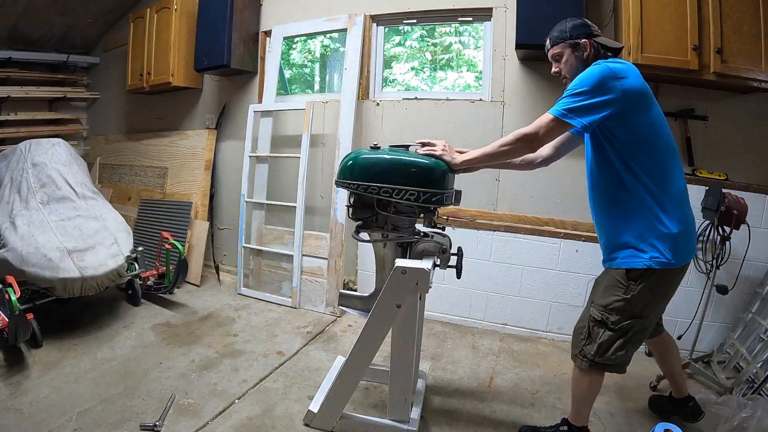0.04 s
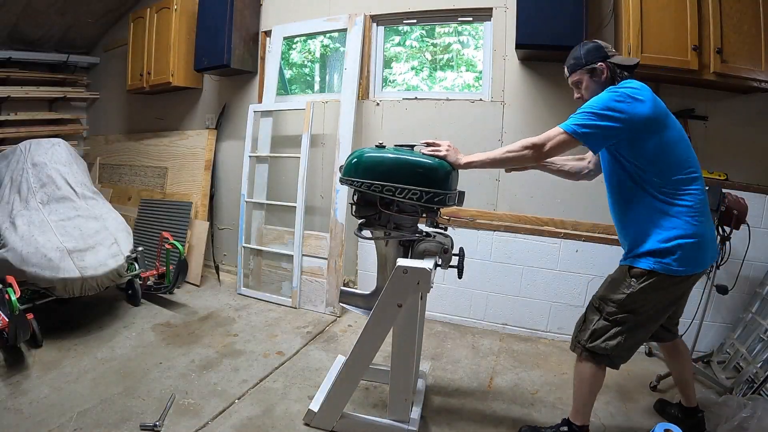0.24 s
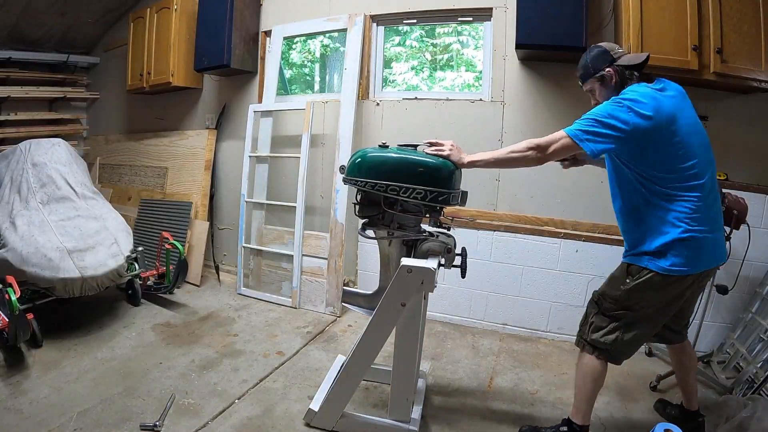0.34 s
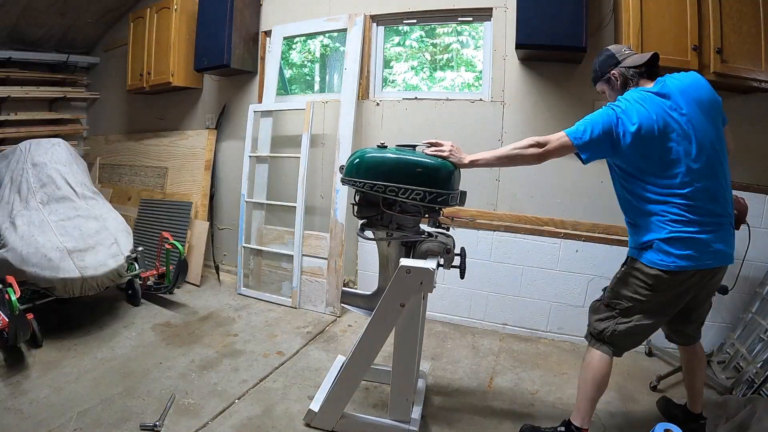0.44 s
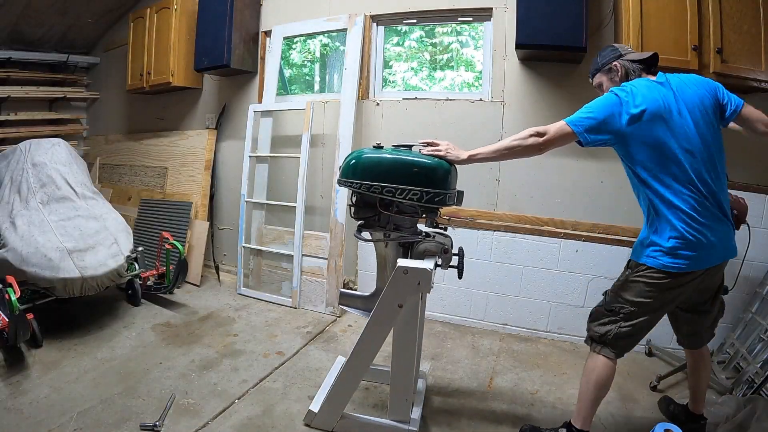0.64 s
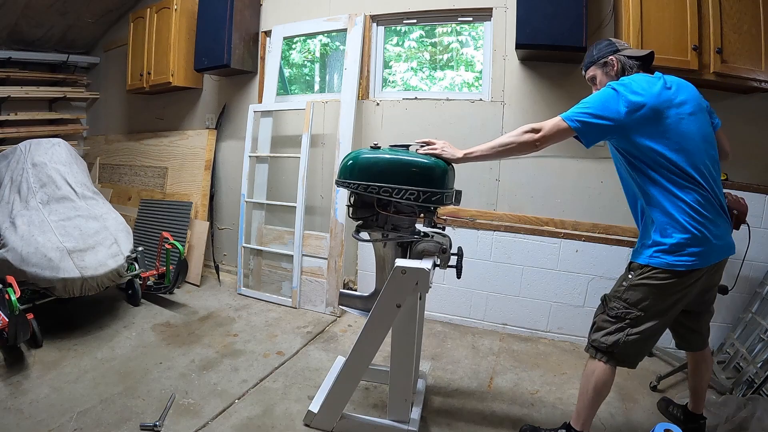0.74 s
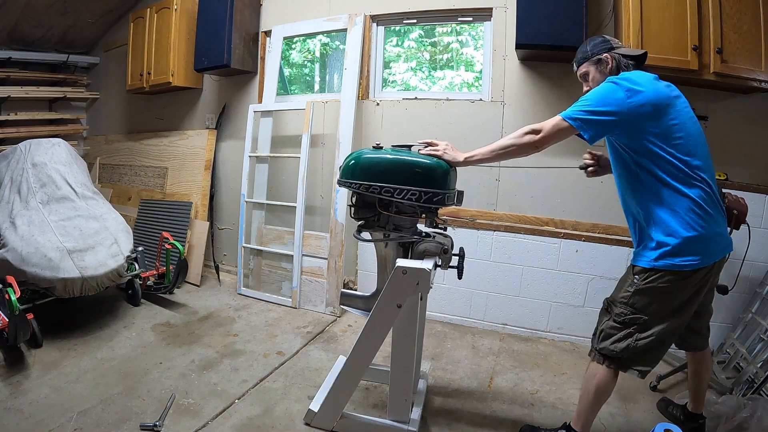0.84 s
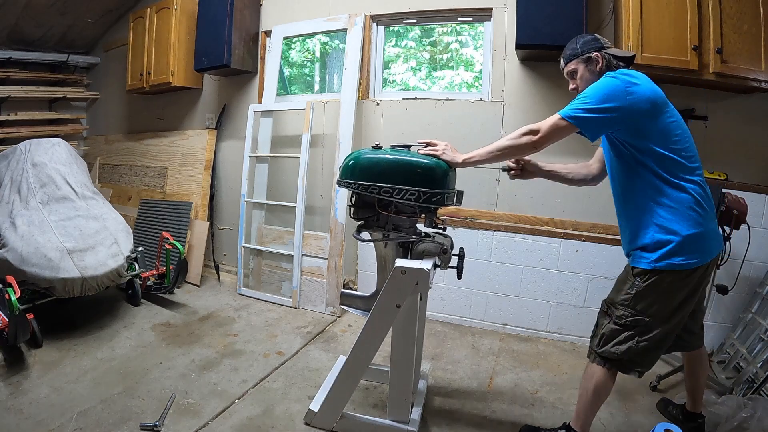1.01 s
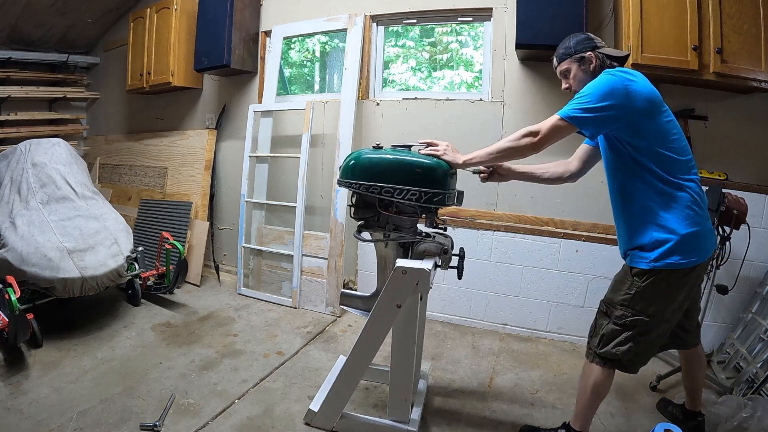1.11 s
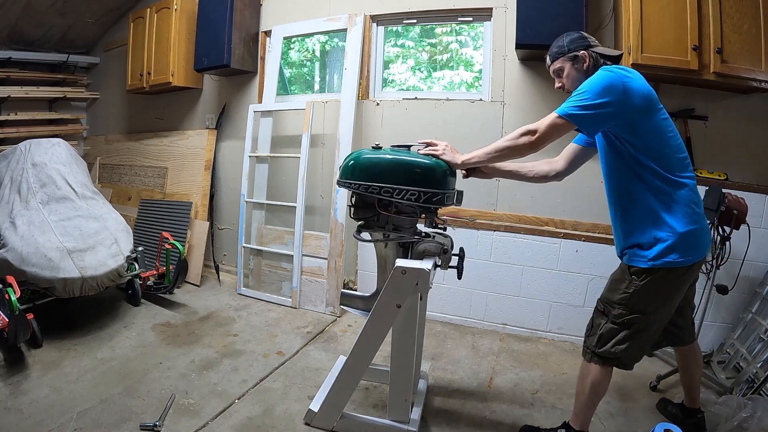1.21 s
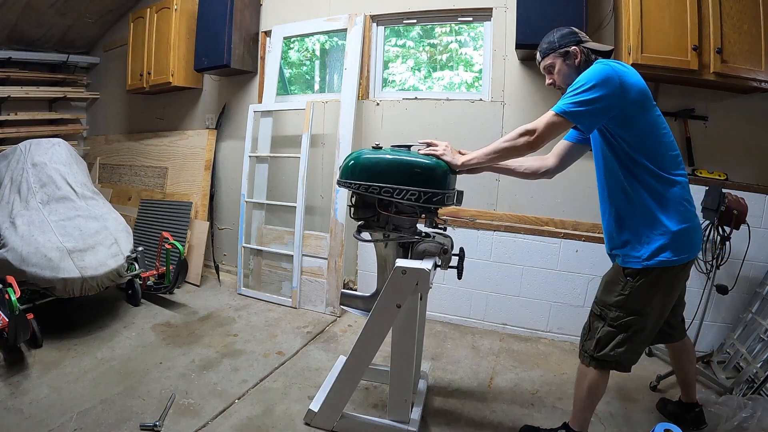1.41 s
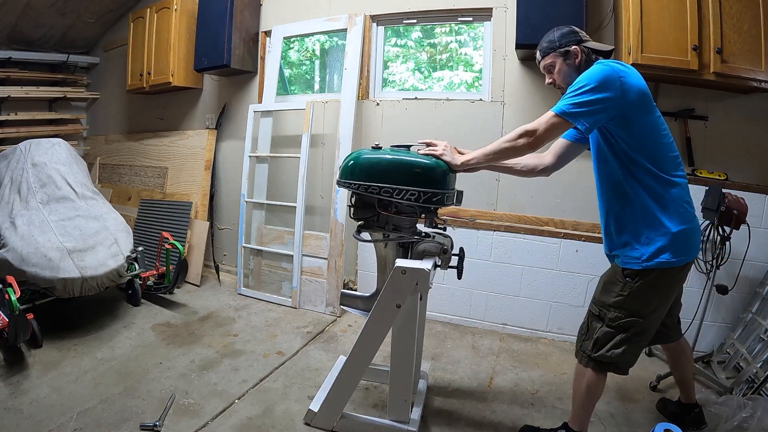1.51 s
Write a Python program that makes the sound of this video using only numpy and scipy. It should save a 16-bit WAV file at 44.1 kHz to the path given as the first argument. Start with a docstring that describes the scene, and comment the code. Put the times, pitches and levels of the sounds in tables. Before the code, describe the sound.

An outboard motor is pull-started once, puffing and coasting down without catching.

```python
"""Outboard pulled over, no start

A two-stroke outboard on a stand in a garage is pulled once and does not catch. The starter pawls clack
in, the cord rasps off its reel, and each piston stroke puffs through the exhaust leg while the
carburettor gulps. The engine coasts down, the cord rewinds and its handle smacks home over a low hum."""
import sys
import numpy as np
from scipy import signal
from scipy.fft import rfft, irfft, next_fast_len
from scipy.io import wavfile

SR = 44100
rng = np.random.default_rng(int(sys.argv[2]) if len(sys.argv) > 2 else 0)


def store_wav(level_fs):
    """Save 16-bit WAV to argv[1]."""
    pcm = np.round(np.clip(np.atleast_2d(level_fs), -1, 1) * 32767)
    wavfile.write(sys.argv[1], SR, pcm.T.astype(np.int16))


N = 68355
T = np.arange(N) / SR


def amp(db):
    """Decibels to gain."""
    return 10 ** (np.asarray(db) / 20)


def unit(x):
    """Scale to rms 1."""
    return x / np.sqrt(np.mean(x ** 2))


def swell(rows):
    """Gain curve through (time_s, level_db) points."""
    return amp(np.interp(T, *np.array(rows).T))


def at_hz(rows, hz):
    """Read a table on a log-frequency axis."""
    freqs, values = np.array(rows, float).T
    return np.interp(np.log(np.maximum(hz, 1)), np.log(freqs), values)


def colour(x, rows, tilt_db_per_oct=0, keep_power=True):
    """Minimum-phase filter through (freq_hz, gain_db) points; keep_power holds white noise's power."""
    size = 2 * next_fast_len(N)
    hz = np.fft.rfftfreq(size, 1 / SR)
    gain = amp(at_hz(rows, hz) + tilt_db_per_oct * np.log2(np.maximum(hz, 200)))
    cepstrum = irfft(np.log(unit(gain) if keep_power else gain))
    cepstrum[1:size // 2] *= 2
    cepstrum[size // 2 + 1:] = 0
    return irfft(rfft(x, size) * np.exp(rfft(cepstrum)))[:N]


def resonate(x, modes):
    """Parallel resonances of (freq_hz, width_hz, gain_db)."""
    return sum(amp(db) * signal.lfilter(*signal.iirpeak(hz, hz / width_hz, SR), x + 1e-18)
               for hz, width_hz, db in modes)


def resonant_noise(modes):
    """Noise passed twice through the resonances, rms 1."""
    return unit(resonate(resonate(rng.standard_normal(N), modes), modes))


def grains(per_s, scatter_db, hiss):
    """Dense tiny contacts over hiss, rms 1."""
    clicks = (rng.random(N) < per_s / SR) * rng.choice([-1, 1], N)
    sizes = amp(scatter_db * np.clip(rng.standard_normal(N), -2, 2))
    return unit(unit(clicks * sizes) + hiss * rng.standard_normal(N))


def burst(start_s, rise_s, decay_s):
    """Quick rise, exponential fall."""
    age_s = np.maximum(T - start_s, 0)
    return (1 - np.exp(-age_s / rise_s)) * np.exp(-age_s / decay_s)


def pulse(centre_s, sigma_s):
    """Gaussian pressure pulse."""
    return np.exp(-.5 * ((T - centre_s) / sigma_s) ** 2)


# garage decay: freq_hz, t60_s
GARAGE_DECAY = [(150, 0.74), (500, 1.06), (1400, 0.68), (4000, .5), (10000, 0.58)]
# echo side channel: freq_hz, gain_db
SIDE_COLOUR = [(60, -27), (130, -31.5), (260, -19.5), (500, -11.5), (1000, -10), (2000, -4), (3300, -2.5),
               (5000, -8.5), (7000, -4.5), (9000, -5)]


def garage(x, wet_db, build_s=0.00073, near_s=0.0011, near_db=-5.5):
    """Direct sound plus diffuse echoes, wider and shorter in the treble."""
    edges_hz = np.geomspace(80, 16000, 9)
    t60_s = at_hz(GARAGE_DECAY, np.sqrt(edges_hz[1:] * edges_hz[:-1]))
    band = np.digitize(np.fft.rfftfreq(N, 1 / SR), edges_hz[1:-1])
    spectrum = rfft(rng.standard_normal((2, N)))
    tail = sum(irfft(spectrum * (band == k), N) * amp(-60 * T / t60) for k, t60 in enumerate(t60_s))
    tail = unit(tail * (1 - np.exp(-T / build_s))) * amp(wet_db) / np.sqrt(N)
    mid, side = signal.fftconvolve(x[None], tail, axes=1)[:, :N]
    # first wall and floor reflections reach the two sides differently
    near = unit(rng.standard_normal(N) * np.exp(-T / near_s)) * amp(near_db) / np.sqrt(N)
    side = side + signal.fftconvolve(x, near)[:N]
    return x + mid + colour(side, SIDE_COLOUR, keep_power=False) * np.array([[1], [-1]])


# room air: freq_hz, gain_db
AIR_COLOUR = [(20, -6), (35, -14), (48, 0), (75, 2), (130, -14), (300, -31.5), (700, -35), (1400, -28.5),
              (2500, -36), (6000, -36), (9000, -48.5), (15000, -56)]


def room_air(level_db=-49.5):
    """Faint steady noise, mostly bass."""
    return amp(level_db) * colour(rng.standard_normal(N), AIR_COLOUR)


# hum, lower tone: time_s, rms_db
HUM_CURVE = [(.2, -40.5), (.33, -58), (1.1, -51.5), (1.55, -47)]


def hum(pitch_hz=73.3, beat_hz=8.1, upper_db=-6.5):
    """Two close low tones beat as a throb."""
    lower = np.sin(2 * np.pi * pitch_hz * T)
    upper = amp(upper_db) * np.sin(2 * np.pi * (pitch_hz + beat_hz) * T)
    return np.sqrt(2) * swell(HUM_CURVE) * (lower - upper)


# powerhead and cowl modes: freq_hz, width_hz, gain_db
COWL_MODES = [(345, 7.9, -5), (370, 52, 2.5), (996, 90, -6), (952, 55, 4.5), (1168, 41, 0.5),
              (1482, 127, 2), (1743, 73, -7), (2644, 30, -2.5), (5980, 70, -2), (6690, 75, 4.5)]


def cowl(contact):
    """Contact noise plus the modes it rings."""
    return contact + resonate(contact, COWL_MODES)


# motor rocking: start_s, level_db, decay_s
MOUNT_ROCKS = [(0.154, -45.5, 0.018), (1.24, -28, 0.012), (1.297, -31.5, 0.0087), (1.405, -36.5, 0.014)]
# rocking spectrum: freq_hz, gain_db
MOUNT_COLOUR = [(80, -4), (280, -18), (350, 16), (420, 13), (550, -5), (950, 6), (2000, -38), (8000, -60)]
# stand rumble: time_s, level_db
RUMBLE_CURVE = [(.15, -68), (.42, -41), (.63, -40), (.9, -34), (1.1, -78)]


def stand(rise_s=0.013, rumble_hz=66, width_hz=37):
    """The motor shifts on its mount and the pull shakes the wooden stand."""
    rocking = sum(amp(db) * burst(start_s, rise_s, decay_s) for start_s, db, decay_s in MOUNT_ROCKS)
    rumble = resonant_noise([(rumble_hz, width_hz, 0)]) * swell(RUMBLE_CURVE)
    return cowl(colour(rocking * rng.standard_normal(N), MOUNT_COLOUR)) + rumble


# handle hits on the cowl: start_s, level_db, rise_s, decay_s
HANDLE_HITS = [(1.182, -29.5, 0.005, 0.017), (1.189, -18, 0.0075, 0.021), (1.221, -27, 0.0044, 0.019)]
# clatter spectrum: freq_hz, gain_db
CLATTER_COLOUR = [(60, -12), (250, -10), (380, -2.5), (600, -2.5), (1200, -2), (1550, 3.5), (2300, 0),
                  (3300, -1.5), (4800, 1.5), (6700, -2.5), (8000, -7.5), (12000, -15), (15000, -32)]
# handle and lid modes: freq_hz, width_hz, gain_db
LID_MODES = [(360, 29, 10), (1440, 19, 10), (1590, 82, 2), (1904, 60, -2), (2800, 45, 2), (3160, 200, 3.5),
             (4700, 190, 0), (6720, 200, 5.5)]


def handle():
    """The spring pulls the handle home: bright clatter fills the garage, the lid rings briefly."""
    contact = sum(amp(db) * burst(start_s, rise_s, decay_s)
                  for start_s, db, rise_s, decay_s in HANDLE_HITS)
    clatter = colour(contact * grains(per_s=6000, scatter_db=0, hiss=1.0), CLATTER_COLOUR)
    return garage(clatter, wet_db=-4) + resonate(clatter, LID_MODES)


# cord take-up, pull and rewind: time_s, relative_db
CORD_CURVE = [(.10, -81), (.155, -73), (.198, -49), (.25, -18), (.33, -27), (.375, -29.5), (.435, -28),
              (.495, -14), (.55, -16.5), (.615, -25.5), (.655, -17.5), (.73, -27), (.80, -23.5),
              (.89, -19.5), (.945, -27.5), (1.01, -24.5), (1.06, -36), (1.135, -34.5), (1.18, -39.5),
              (1.30, -31), (1.37, -85)]
# rasp spectrum: freq_hz, gain_db
CORD_COLOUR = [(60, -19), (200, -9), (550, 0), (1100, -3), (2400, -2.5), (4000, -6), (6500, -9),
               (7800, -14.5), (12000, -25), (15000, -44)]


def cord(gain_db=-8):
    """The cord rasps through its guide and the reel scrapes under the cowl."""
    rasp = grains(per_s=1800, scatter_db=3, hiss=0.84) * swell(CORD_CURVE)
    return amp(gain_db) * cowl(colour(rasp, CORD_COLOUR))


def pawl(pitch_hz=5930, gain_db=-14):
    """The steel pawl pings as it drops into the flywheel."""
    envelope = burst(start_s=0.2245, rise_s=0.00071, decay_s=0.006)
    return amp(gain_db) * envelope * np.sin(2 * np.pi * pitch_hz * T)


# pawl and reel knocks: start_s, relative_db, rise_s, decay_s, tilt_db_per_oct, thud_offset_db
STARTER_KNOCKS = [(0.137, -29.5, 0.026, 0.018, -2, -29), (0.2, -15.5, 0.011, 0.06, -4, -23),
                  (0.223, 3, 0.0072, 0.012, -1, -11), (.240, -1, 0.0032, 0.0031, -6, 1.5),
                  (0.304, -12, 0.0017, 0.034, 0, -12), (0.394, -18, 0.0033, 0.033, -4, -26),
                  (0.453, -2, 0.0097, 0.016, -2.5, -15), (0.545, -4, 0.0046, 0.003, -4, -12.5),
                  (.584, -2.5, 0.0047, 0.017, 0, 0), (0.74, -4.5, 0.0028, 0.026, 4, -40),
                  (.845, -7, 0.0022, 0.0098, 2.5, -15.5), (0.871, -4, 0.0069, 0.0093, -3, -16),
                  (.958, -17.5, 0.0087, 0.023, 11.5, -16), (1.085, -12.5, 0.0075, 0.014, 1.5, -26)]
# chatter spectrum: freq_hz, gain_db
CHATTER_COLOUR = [(60, -17), (200, -11), (550, -2), (1400, 0.5), (2400, 1), (4000, -1), (6500, -6),
                  (7800, -16), (12000, -26.5), (15000, -46)]
# motor and stand modes: freq_hz, width_hz, gain_db
BODY_MODES = [(110, 24, -6.5), (145.6, 27, -9), (345, 10, 8), (370, 22, 10)]


def knocks(chatter_db=-12, thud_sigma_s=0.00085):
    """Metal parts meet and chatter; hard blows also thud through the body."""
    contacts = grains(per_s=6100, scatter_db=5.5, hiss=0.59)
    chatter = thuds = 0
    for start_s, db, rise_s, decay_s, tilt, thud_db in STARTER_KNOCKS:
        blow = contacts * burst(start_s, rise_s, decay_s)
        chatter += amp(db + chatter_db) * colour(blow, CHATTER_COLOUR, tilt)
        thuds += amp(db + thud_db) * pulse(start_s + 2 * thud_sigma_s, thud_sigma_s)
    return cowl(chatter) + resonate(thuds, BODY_MODES)


# hard strokes: start_s, level_db
HARD_STROKES = [(.461, -26), (.495, -12.5), (0.547, -8.5), (0.639, -23), (0.865, -18.5)]
# powerhead modes: freq_hz, gain_db
POWERHEAD_MODES = [(825, -9.5), (950, -1), (1186, -7), (1510, -10.5)]


def clonks(rise_s=0.005, decay_s=0.01):
    """The hardest strokes ring the hollow powerhead."""
    ringing = 0
    for start_s, db in HARD_STROKES:
        envelope = burst(start_s, rise_s, decay_s)
        for hz, mode_db in POWERHEAD_MODES:
            ringing += amp(db + mode_db) * envelope * np.sin(2 * np.pi * (hz * T + rng.random()))
    return ringing


# carburettor gulps: start_s, relative_db, decay_s, pitch_hz
INTAKE_GULPS = [(0.478, 1.5, 0.0069, 360), (0.546, 3, 0.0096, 351.6), (0.601, -12.5, 0.024, 370),
                (0.634, 2.5, 0.0099, 413.5), (0.68, -3, 0.008, 460), (.792, -9.5, 0.0069, 510),
                (0.823, -5, 0.02, 420), (0.865, -10, 0.015, 345), (1.019, -15, 0.0085, 408),
                (1.123, -15, 0.0081, 432)]
# throat overtones: freq_hz, width_hz, gain_per_pass_db
THROAT_MODES = [(407, 510, -3), (646, 300, -6.5), (928, 100, -4), (1600, 610, -7.5)]


def intake(rise_s=0.013, note_db=-4.5, rush_db=-11):
    """Each gulp of air sounds the carburettor throat: a hollow note inside a rush."""
    flow = notes = 0
    for start_s, db, decay_s, pitch_hz in INTAKE_GULPS:
        gulp = amp(db) * burst(start_s, rise_s, decay_s)
        flow += gulp
        notes += gulp * np.sin(2 * np.pi * pitch_hz * (T - start_s))
    return amp(note_db) * notes + amp(rush_db) * flow * resonant_noise(THROAT_MODES)


# leg drone: time_s, level_db
DRONE_CURVE = [(.41, -87), (.47, -33.5), (.70, -30.5), (.90, -45), (1.14, -44.5), (1.35, -74)]
# drone resonances: freq_hz, width_hz, gain_per_pass_db
DRONE_BANDS = [(143, 40, 0.13), (178, 94, -1.5)]


def leg_drone():
    """The turning shaft keeps the hollow leg drumming between puffs."""
    return resonant_noise(DRONE_BANDS) * swell(DRONE_CURVE)


# puffs, one per stroke: centre_s, relative_db, sigma_s
EXHAUST_PUFFS = [(0.457, 1, .0015), (0.5143, 0.5, 0.0014), (0.558, 3.5, 0.0016), (0.6003, -0.5, 0.001),
                 (0.6462, 0, .0024), (0.687, -0.5, 0.0016), (0.7394, -2, 0.00117), (0.8035, -2.5, 0.00037),
                 (0.888, -6.5, 0.00086), (0.986, -11.5, 0.0009), (1.132, -15, 0.00062)]
# exhaust leg modes: freq_hz, width_hz, gain_db
LEG_MODES = [(128, 84, -4.5), (118.7, 7.7, -3.5), (132.6, 9.6, -4.5), (158, 12, -10.5), (196.7, 26, 2.5),
             (70, 12, -7)]


def exhaust(gain_db=-3.5, low_cut_hz=60):
    """Each port opening sends an unburnt puff down the leg; the small outlet radiates no deep bass."""
    puffs = sum(amp(db) * pulse(centre_s, sigma_s) for centre_s, db, sigma_s in EXHAUST_PUFFS)
    outlet = signal.butter(2, low_cut_hz, "highpass", fs=SR, output="sos")
    return amp(gain_db) * resonate(signal.sosfilt(outlet, puffs), LEG_MODES)


def scene():
    """Engine, starter and stand in the garage, over hum and room air."""
    return (garage(exhaust() + leg_drone(), wet_db=-9)
            + garage(intake(), wet_db=-14)
            + garage(knocks() + clonks() + pawl(), wet_db=-5)
            + handle()
            + garage(cord(), wet_db=-6)
            + garage(stand(), wet_db=-10)
            + hum()
            + garage(room_air(), wet_db=-3))


def record(dry):
    """Soft-clip the peaks, then cut the top treble."""
    ceiling, top_hz = 0.74, 14200
    rounded = ceiling * np.tanh(dry / ceiling)
    lowpass = signal.ellip(8, .2, 70, top_hz, fs=SR, output="sos")
    return signal.sosfilt(lowpass, rounded)


dry = scene()
out = record(dry)
store_wav(out)
```